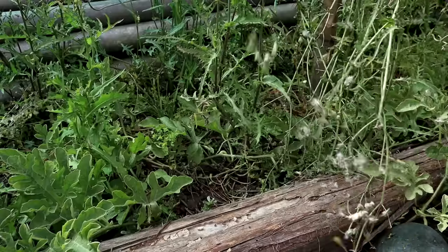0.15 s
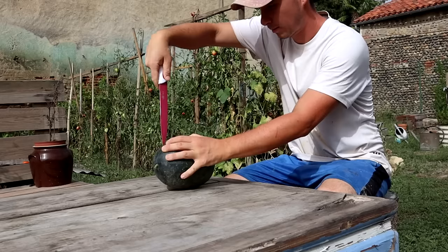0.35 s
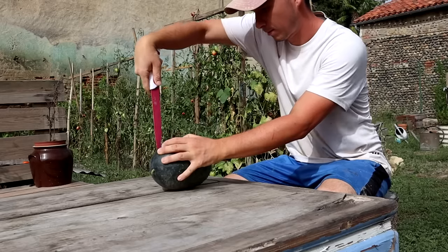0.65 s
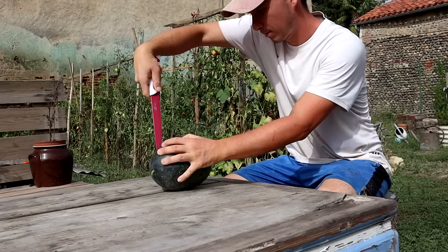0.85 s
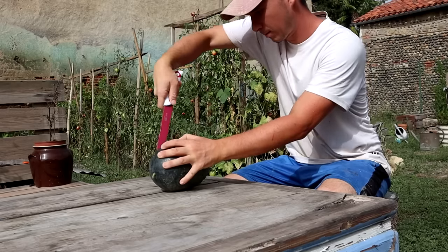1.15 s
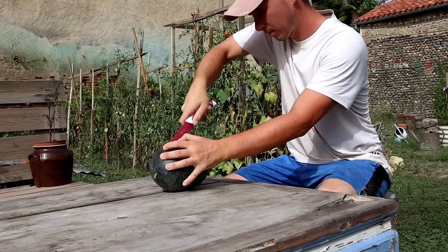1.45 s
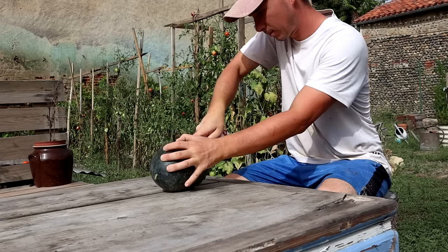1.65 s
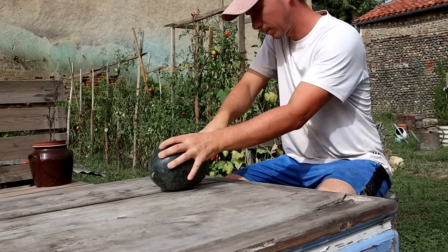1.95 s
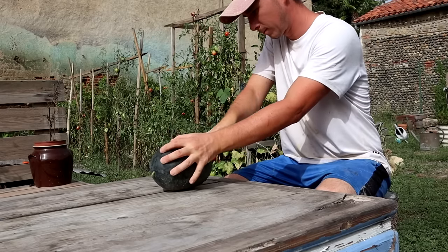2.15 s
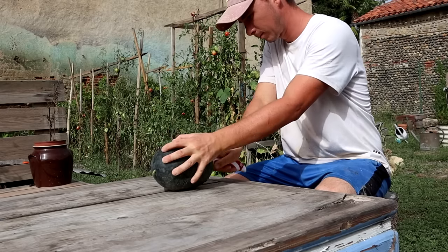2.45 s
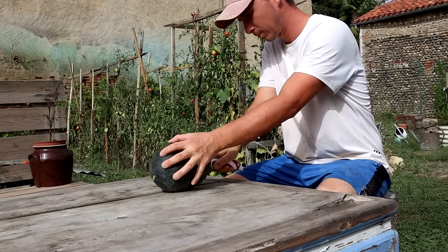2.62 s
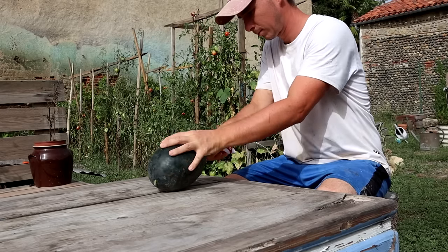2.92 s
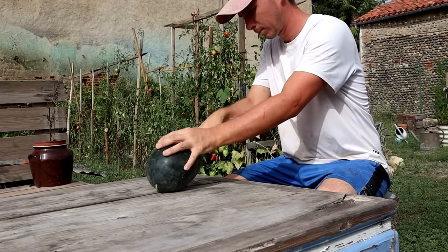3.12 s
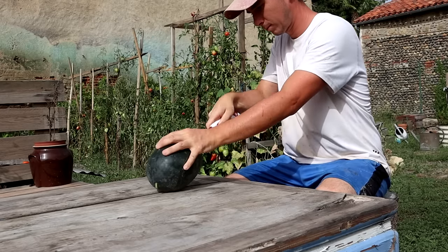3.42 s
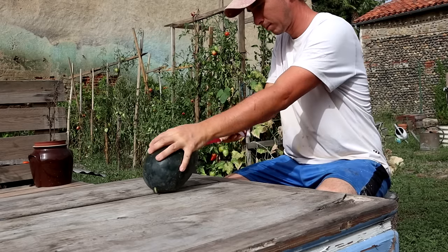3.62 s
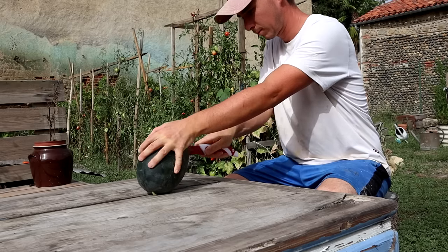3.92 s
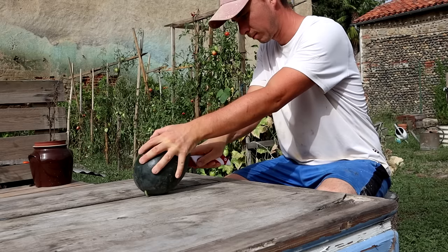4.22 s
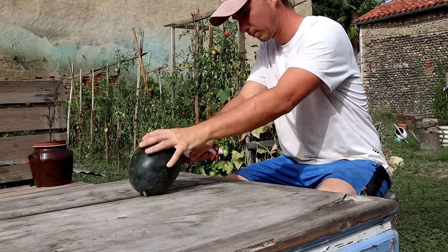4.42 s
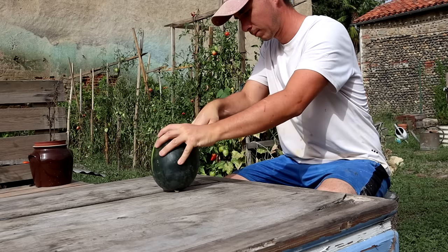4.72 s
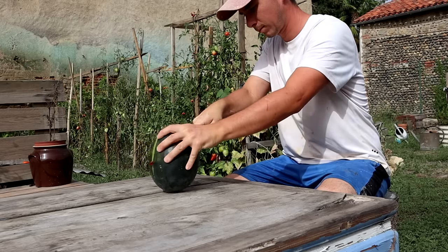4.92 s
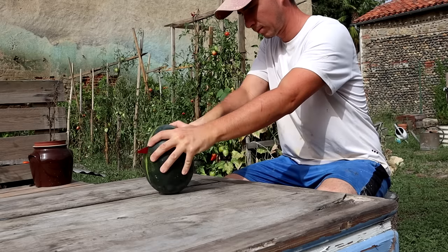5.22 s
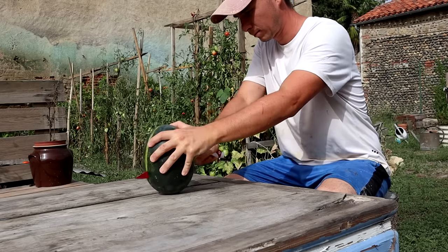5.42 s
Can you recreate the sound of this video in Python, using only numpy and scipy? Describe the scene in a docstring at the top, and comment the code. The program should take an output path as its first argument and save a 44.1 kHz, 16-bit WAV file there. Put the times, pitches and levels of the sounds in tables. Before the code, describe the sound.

A brief rustle of foliage with dry ticks gives way to near silence. A blade pushes into a melon close to the microphone: a crackling crunch, then a sharp snapping cluster, scattered scrapes and small cracks. Late on, the rind squeaks against the blade, rising and falling, before bright rasping cracks end it. A very faint bird whistles far off in the quiet yard.

```python
"""Knife through a watermelon

After rustling leaves, a long knife is worked round a watermelon on a wooden garden table.
Grain noise through resonances makes the rasp; splits of the rind snap, ring and thump modes of the melon.
Once the wet rind grips the steel and squeaks loudly: a gliding stick-slip tone with overtones.
The garden is quiet: shaped noise for air and leaves, swooping sines for a far bird.
"""
import sys
import numpy as np
from scipy import signal
from scipy.io import wavfile
from scipy.ndimage import uniform_filter1d

SR = 44100
rng = np.random.default_rng(int(sys.argv[2]) if len(sys.argv) > 2 else 0)


def file_out(sig):
    """Save sig as 16-bit WAV at sys.argv[1]."""
    # one column per channel
    cols = np.atleast_2d(sig).T
    # limit, then scale
    lim = np.clip(cols, -1, 1)
    pcm = np.round(lim * 32767).astype(np.int16)
    wavfile.write(sys.argv[1], SR, pcm)


N = 245637
TIME_S = np.arange(N) / SR
CUTOFF_HZ = 16000

# Air of the garden. Each row: frequency in Hz, density in relative dB per Hz.
AIR_SPECTRUM = [(15, -39), (25, -7), (206, -0.5), (427, -11), (714, -13), (796, -17), (1100, -18),
                (1400, -23), (1650, -18), (1940, -13), (2550, -27), (3920, -18), (5140, -31), (16000, -28)]
AIR_DB = -51
# Rustling leaves. Each row: frequency in Hz, density in relative dB per Hz.
LEAF_SPECTRUM = [(35, -46), (60, -16), (118, -18), (168, 3), (579, 1), (636, 6), (1340, 0.5), (3270, -3.5),
                 (6580, -17), (9350, -20), (13900, -16), (16000, -22)]
# Course of the rustle. Each row: time in seconds, relative level in dB.
RUSTLE_LEVELS = [(0.0, -28.5), (.116, -32.5), (.135, -49), (.15, -35.5), (.21, -35), (.245, -34.5),
                 (.35, -34)]
RUSTLE_END_S = 0.359
# Stems snapping among the leaves. Each row: start in seconds, peak in dB, pitch in Hz.
STEM_SNAPS = [(0.025, -17, 4230), (0.0555, -13.5, 3120), (0.1052, -18, 2350), (.121, -16, 5540),
              (.1315, -14.5, 6060), (0.134, -19, 6650), (0.137, -24, 7100), (0.2365, -12.5, 3250),
              (.254, -24, 5530)]
# Far bird. Each row: start in seconds, length in seconds, pitch in Hz, swoop in Hz, arches of the swoop,
# relative level in dB.
BIRD_NOTES = [(1.914, 0.071, 1800, 198, 2.1, -53), (1.972, .052, 1900, 600, 0.3, -51),
              (2.052, 0.034, 1780, 220, 0.56, -49), (2.085, 0.054, 1990, 700, 1.46, -44),
              (2.144, 0.074, 1980, 479, 2.1, -47.5), (2.247, .045, 1750, 130, 0.54, -53),
              (3.379, 0.054, 1857, 140, 0.49, -50), (3.42, 0.057, 2000, 450, 2.2, -50.5),
              (3.478, 0.078, 2010, -220, 2.65, -50), (3.662, .07, 2070, 282, 1.4, -54)]

# Free length of the blade singing. Each row: time in seconds, frequency in Hz, level in dB.
BLADE_SINGING = [(.93, 5500, -80), (1.0, 5420, -58), (1.17, 5310, -51), (1.38, 5240, -63), (1.5, 5300, -60),
                 (1.62, 5200, -72)]
# Pushes and pulls of the blade. Each row: full force at in seconds, attack in seconds, hold in seconds,
# then rasp of the rind, drag on the melon, coarse hiss and fine hiss in dB.
BLADE_STROKES = [(0.468, 0.065, 0.16, -57.5, -55.5, -63, -63), (0.742, 0.066, 0.11, -50.5, -58.5, -56, -54),
                 (0.976, .08, 0.38, -48, -52, -54, -59), (1.305, 0.52, 0.14, -64, -48.5, -64, -70),
                 (1.442, .12, 0.065, -36.5, -36, -45.5, -50), (1.557, 0.17, 0.028, -29.5, -32, -42, -43.5),
                 (1.672, 0.052, 0.078, -30.5, -26.5, -41, -39.5), (2.003, 0.073, .015, -56, -64, -56, -60),
                 (2.168, 0.092, 0.11, -56, -59.5, -63, -67), (2.335, 0.055, 0.071, -36, -41, -47, -48),
                 (2.492, 0.095, 0.056, -36, -46, -52.5, -48.5), (2.546, 0.029, 0.026, -27, -31, -36, -42),
                 (2.606, .02, 0.009, -46, -42, -57, -62), (2.732, 0.044, 0.062, -38.5, -53, -42, -49),
                 (2.942, 0.082, 0.077, -53, -60, -52.5, -50), (3.14, 0.019, .02, -43.5, -56, -50.5, -56),
                 (3.248, 0.042, 0.075, -44, -55.5, -53.5, -59.5),
                 (3.86, 0.27, 0.088, -46.5, -49.5, -52, -58), (3.939, 0.039, 0.012, -34.5, -37.5, -40, -44),
                 (4.031, .04, 0.063, -35.5, -36.5, -45, -49), (4.13, .05, .02, -43, -47.5, -54, -60),
                 (4.26, .08, 0.048, -39.5, -54.5, -46, -54), (4.207, 0.065, .01, -35, -45, -43, -53),
                 (4.349, 0.041, .012, -35.5, -42, -42.5, -49.5), (4.46, 0.13, 0.077, -53, -65, -58, -52),
                 (4.594, 0.077, .005, -38, -53, -41, -51), (4.789, 0.045, 0.018, -46, -34.5, -63, -69),
                 (4.953, 0.068, 0.011, -36.5, -43, -42.5, -41.5),
                 (5.008, 0.041, 0.0031, -38.5, -39, -49, -59), (5.073, 0.033, 0.096, -51, -55, -59, -63),
                 (5.333, 0.033, 0.053, -23.5, -36, -31.5, -34), (5.437, 0.041, 0.009, -33.5, -43, -38, -42),
                 (5.518, 0.082, 0.026, -38, -50, -48, -53)]
STROKE_RAMP_DB = 20  # swing over one attack or one release
# A stroke of FIRM_DB dies in RELEASE_S; each RELEASE_HALVES_DB more force halves that.
RELEASE_S, FIRM_DB, RELEASE_HALVES_DB = .07, -40, 26
# Melon under the dragging blade. Each row: frequency in Hz, width in Hz, gain in dB.
DRAG_PEAKS = [(128, 27, 4), (246, 54, -4), (330, 18, 6), (450, 81, 4), (625, 173, 6), (1044, 730, -5)]
# Blade held in the rind. Each row: frequency in Hz, width in Hz, gain in dB.
BLADE_PEAKS = [(1580, 460, -1.5), (1976, 300, 5), (2520, 730, 2.5), (3190, 410, 2.5), (3760, 640, -1.5),
               (5290, 1080, -4.5), (6200, 500, -10)]

# Stick-slip of the rind on the steel. Each row: time in seconds, slips per second before jitter.
SLIP_RATES = [(4.592, 790), (4.605, 950), (4.611, 680), (4.63, 830), (4.642, 730), (4.675, 1250),
              (4.681, 1520), (4.697, 1700), (4.712, 1570), (4.717, 1320), (4.755, 1030), (4.76, 540),
              (4.802, 290)]
# Grip of the rind. Each row: time in seconds, tone in dB, overtones in dB.
GRIP_LEVELS = [(4.588, -16, -33), (4.596, -7, -21), (4.636, -9.5, -15), (4.664, -11, -19),
               (4.684, -13, -34.5), (4.708, -19, -34.5), (4.718, -15.5, -29.5), (4.724, -22, -23),
               (4.736, -6.5, -23.5), (4.75, -18.5, -27), (4.758, -21, -35), (4.782, -19, -36),
               (4.8, -33.5, -57)]
# Raggedness of the slips. Each row: slips per second, roughness from 0 to 1.
SLIP_ROUGHNESS = [(700, 0.53), (950, 0.37), (1250, 0.03)]
# Rind driven by the slips. Each row: frequency in Hz, width in Hz, gain in dB.
RIND_PEAKS = [(309, 28, 3), (483, 36, 4.5), (544, 110, -4), (722, 66, -0.5), (846, 55, -7), (940, 45, -14),
              (1130, 70, -0.5), (1243, 93, -2), (1290, 71, -3), (1602, 61, 3.5)]
# Blade clamped by the rind. Each row: frequency in Hz, width in Hz, gain in dB.
CLAMPED_BLADE_PEAKS = [(1320, 300, 3), (2080, 165, 4.5), (2760, 210, -1), (3700, 460, -5),
                       (4160, 240, -1.5), (5080, 260, -4), (7260, 570, -16)]
SQUEAK_START_S, SQUEAK_END_S = 4.585, 4.803
SQUEAK_ATTACK_S, SQUEAK_RELEASE_S = 0.0068, 0.01
SPRAY_DB = -11.5  # juice spray against the overtones

# Clear splits of the rind, levels as rms over CRACK_S. Each row: start in seconds, ring pitch in Hz,
# ring in dB, snap in dB, thump in dB.
RIND_CRACKS = [(1.523, 1705, -24, -30, -24.5), (1.5402, 1020, -30, -28, -24.5),
               (1.561, 1590, -20.5, -23, -21.5), (1.583, 605, -25, -32, -36), (1.65, 644, -25, -28.5, -35),
               (1.6613, 660, -16, -25, -38), (1.672, 694, -9.5, -23, -27), (1.6888, 790, -11.5, -26, -40),
               (1.7075, 1470, -15, -21, -17.5), (1.729, 760, -18, -24, -31),
               (1.7505, 1920, -21.5, -27, -21), (1.7731, 1380, -28.5, -26.5, -46),
               (2.2907, 1700, -32, -30, -39.5), (2.334, 1740, -30, -28.5, -45),
               (2.339, 2190, -30, -22, -23), (2.342, 1810, -22, -20, -33),
               (2.3645, 3500, -15.5, -18.5, -12.5), (2.374, 620, -39.5, -35, -29.5),
               (2.4, 570, -42, -31, -54), (2.5235, 2250, -30.5, -30, -43), (2.5436, 2170, -20, -16.5, -20),
               (2.5455, 726, -15.5, -34, -21.5), (2.5543, 2260, -18.5, -28, -43),
               (2.569, 730, -23, -23, -35), (2.586, 1105, -13.5, -41, -13), (3.772, 2300, -45, -40, -54),
               (3.7895, 2210, -48, -42, -55), (3.803, 2280, -48, -38, -44), (3.832, 2300, -40, -33, -45),
               (3.915, 1810, -45, -37, -42), (3.927, 800, -28, -31.5, -40), (3.941, 764, -25, -22, -30.5),
               (3.951, 1280, -27, -28.5, -42), (3.957, 2380, -26.5, -26.5, -25.5),
               (4.0145, 2170, -28.5, -26.5, -31), (4.0336, 2140, -25.5, -25.5, -29),
               (4.052, 2040, -20, -24, -21), (4.061, 1210, -38, -33, -23),
               (4.0775, 1740, -22.5, -27.5, -35), (4.774, 960, -25, -35, -26), (4.78, 710, -37, -34.5, -16),
               (5.2422, 1930, -30.5, -28, -42.5), (5.2875, 1700, -39.5, -34, -43),
               (5.3053, 2010, -30, -25.5, -40), (5.323, 2170, -31, -29, -39),
               (5.3515, 1630, -22.5, -40, -44), (5.3839, 1646, -13, -21, -24.5),
               (5.3895, 1660, -14, -15.5, -35), (5.3971, 1630, -21, -17, -21.5),
               (5.4261, 1700, -14, -17.5, -29), (5.434, 1820, -21, -16.5, -27.5),
               (5.458, 1640, -27.5, -25, -39), (5.5367, 1700, -35.5, -30.5, -40.5)]
CRACK_S = .005
# Seat of the melon and wetness of the cut. Each row: time in seconds, lift of the low modes in dB per
# octave, fizz over snap in dB.
SEAT_AND_WETNESS = [(1.55, 5.5, -10.5), (1.68, -3.5, -6.5), (1.77, 8, -7), (2.36, 2.5, -7),
                    (2.53, 9.5, -6.5), (2.6, 6, -7), (3.95, -4, -3.5), (4.08, -5, -2.5), (5.3, -1, -12)]
# Modes of the melon on its table. Each row: frequency in Hz, relative level in dB, t60 in seconds.
MELON_MODES = [(137.3, -7.5, 0.24), (178.5, -14.5, 0.22), (216.6, -4, 0.21), (277.6, -3, 0.12),
               (341.8, 2, 0.14), (380, -1, 0.19), (436, -6, 0.22), (493.3, 4, 0.13), (563.6, 3.5, 0.085),
               (613, 6, 0.017), (708, 5, 0.082), (803, -5, 0.049), (950, -14.5, 0.1), (1070, -13, 0.048),
               (1171, -11.5, 0.051), (1400, -35, 0.12), (1457, -12, 0.097)]
# Wet cells spitting from a split. Each row: frequency in Hz, width in Hz, gain in dB.
JUICE_PEAKS = [(7360, 2300, 4.5), (11300, 2300, 1.5), (13300, 2100, 4), (15200, 2500, 0)]
# Random chips: candidates per second, least rasp, level against the stroke and its spread either way.
CHIPS_PER_S, CHIP_ABOVE_DB, CHIP_DB, CHIP_SPREAD_DB = 48, -36, -5, 3.5
CHIP_LOW_HZ, CHIP_HIGH_HZ = 600, 2220


def from_db(db):
    """Decibels to gain."""
    return 10 ** (np.asarray(db) / 20)


def rms_one(x):
    """Scale to rms 1."""
    return x / np.sqrt(np.mean(x ** 2) + 1e-20)


def crack_one(x):
    """Scale to the energy of rms 1 held for CRACK_S."""
    return x / np.sqrt(np.sum(x ** 2) / (CRACK_S * SR) + 1e-20)


def evened(x):
    """Hold the rms near 1 over windows of about 6 ms."""
    return x / np.sqrt(np.abs(uniform_filter1d(x * x, size=260)) + 1e-12)


def in_time(rows, t_s=TIME_S):
    """Interpolate each column of a time curve at t_s."""
    rows = np.array(rows, float)
    rows = rows[np.argsort(rows[:, 0])]
    return [np.interp(t_s, rows[:, 0], column) for column in rows.T[1:]]


def add(out, start_s, sound):
    """Mix a sound in at start_s."""
    i = max(round(start_s * SR), 0)
    out[i:i + len(sound)] += sound[:N - i]


def band(x, low_hz, high_hz, order=2):
    """Butterworth band-pass, upper edge capped at 0.45 SR."""
    edges_hz = [low_hz, min(high_hz, .45 * SR)]
    sos = signal.butter(order, edges_hz, "band", fs=SR, output="sos")
    return signal.sosfilt(sos, x + 1e-18)


def resonate(x, peaks):
    """Parallel two-pole resonances of alternating sign."""
    out = 0
    for k, (hz, width_hz, db) in enumerate(peaks):
        r = np.exp(-np.pi * width_hz / SR)
        poles = [1, -2 * r * np.cos(2 * np.pi * hz / SR), r * r]
        gain = (-1) ** k * from_db(db) * (1 - r * r) / 2
        out = out + gain * signal.lfilter([1, 0, -1], poles, x + 1e-18)
    return out


def drift(rate_hz, size=N):
    """Random values of rms 1, joined by straight lines, rate_hz new ones a second."""
    at = np.arange(size) * rate_hz / SR
    return rms_one(np.interp(at, np.arange(8192), rng.standard_normal(8192)))


def grains(spread_db, size=N):
    """A dense stream of tiny ruptures of very unequal size; rms 1."""
    size_db = spread_db * np.minimum(rng.exponential(1, size), 6)
    return rms_one(rng.standard_normal(size) * from_db(size_db))


def burst(t_s, tear_s, after_db, after_s, first):
    """One fibre breaks, its neighbours tear at once, and a few more follow."""
    decay = np.exp(-t_s / tear_s) + from_db(after_db) * np.exp(-t_s / after_s)
    tear = grains(4.1, size=len(t_s)) * decay
    tear = tear / np.sqrt(np.sum(tear ** 2))
    tear[0] = first
    return tear


def colour(x, spectrum):
    """Weight half-octave bands of x by a spectrum; rms 1."""
    hz, db = np.transpose(spectrum)
    edges_hz = 22 * 2 ** np.arange(0, 10, .5)
    out = 0
    for low_hz, high_hz in zip(edges_hz, edges_hz[1:]):
        if high_hz > hz[0]:
            centre_db = np.interp(np.log(low_hz * high_hz) / 2, np.log(hz), db)
            out = out + from_db(centre_db) * band(x, low_hz, high_hz, order=1)
    return rms_one(band(out, hz[0], 2 * CUTOFF_HZ))


def yard(x, wet_db, t60_s, dull_hz):
    """Table top, fence and walls scatter back a short, dull tail."""
    t_s = np.arange(SR // 3) / SR
    noise = band(rng.standard_normal(len(t_s)), 110, dull_hz, order=1)
    tail = noise * from_db(-60 * t_s / t60_s) * (t_s > .002)
    tail = tail / np.sqrt(np.sum(tail ** 2))
    return x + from_db(wet_db) * signal.fftconvolve(x, tail)[:N]


def air():
    """Quiet garden air: steady noise, strongest in the bass."""
    return from_db(AIR_DB) * colour(rng.standard_normal(N), AIR_SPECTRUM)


def leaves():
    """Leaves brush together as fluttering grains; a few dry stems tick as short resonant bursts."""
    level_db, = in_time(RUSTLE_LEVELS)
    brushing = colour(grains(2.5) * from_db(2.1 * drift(153.1)), LEAF_SPECTRUM)
    fade = np.clip((RUSTLE_END_S - TIME_S) / 0.0021, 0, 1)
    out = from_db(level_db - 4.0) * brushing * fade
    t_s = np.arange(SR // 40) / SR
    for start_s, peak_db, hz in STEM_SNAPS:
        tear = burst(t_s, tear_s=0.0005, after_db=-6, after_s=0.0036, first=0.94)
        tick = resonate(tear, [(hz, 1500, 0)])
        add(out, start_s, from_db(peak_db) * tick / np.max(np.abs(tick)))
    return out


def bird(top_db):
    """A thin whistle that slurs or trills in quick arches, loudest at the top of each."""
    out = np.zeros(N)
    for start_s, length_s, hz, swoop_hz, arches, db in BIRD_NOTES:
        along = np.linspace(0, 1, round(length_s * SR))
        arch = np.abs(np.sin(np.pi * arches * along))
        whistle = np.sin(2 * np.pi * np.cumsum(hz + swoop_hz * arch) / SR)
        gain = from_db(db + np.clip(top_db, 1, 8) * (arch - 2.5))
        add(out, start_s, gain * signal.windows.tukey(len(along), .5) * whistle)
    return yard(out, wet_db=-11, t60_s=.2, dull_hz=4000)


def singing(width_hz):
    """Friction keeps one mode of the steel ringing; it mostly sinks as the flesh loads the blade."""
    hz, db = in_time(BLADE_SINGING)
    r = np.exp(-np.pi * width_hz / SR)
    noise = rng.standard_normal(N) + 1j * rng.standard_normal(N)
    rubbing = signal.lfilter([1], [1, -2 * r, r * r], noise)
    carrier = np.exp(2j * np.pi * np.cumsum(hz) / SR)
    return from_db(db) * rms_one(np.real(rubbing * carrier))


def blade_work():
    """Strokes swell, hold and die, hard ones soonest; rows: s, then rasp, drag, coarse, fine hiss in dB."""
    t_s = np.arange(0, N / SR, .002)
    power = 1e-12
    for full_s, attack_s, hold_s, *levels_db in BLADE_STROKES:
        release_s = RELEASE_S * 2 ** ((FIRM_DB - max(levels_db)) / RELEASE_HALVES_DB)
        away = np.maximum((full_s - t_s) / attack_s, (t_s - full_s - hold_s) / release_s)
        fall_db = STROKE_RAMP_DB * np.clip(away, 0, 10)[:, None]
        power = power + from_db(np.array(levels_db) - fall_db) ** 2
    return np.column_stack([t_s, 10 * np.log10(power)])


def slicing(judder_db, deepen):
    """Cells burst along the edge; the harder the blade is pushed, the more it judders."""
    rasp_db, drag_db, coarse_db, fine_db = in_time(blade_work())
    push = np.clip((rasp_db + 49) / 20, .1, 1)
    cells = grains(2.9) * from_db(judder_db * push * (drift(350) - 1.0))
    drag = rms_one(band(resonate(cells, DRAG_PEAKS), 148, 1650))
    # a blade that drags hard rasps low; one that slides freely rasps high
    steel = resonate(cells, BLADE_PEAKS)
    depth = from_db(deepen * np.clip(drag_db - rasp_db + 1.5, -14, 3))
    low_rasp = rms_one(band(steel, 940, 2240))
    high_rasp = rms_one(band(steel, 3110, 5330))
    rasp = (depth * low_rasp + high_rasp) / np.hypot(1, depth)
    coarse = rms_one(band(cells, 5300, 8200))
    fine = rms_one(band(cells, 12000, 14500))
    hiss = from_db(coarse_db) * coarse + from_db(fine_db) * fine
    return from_db(drag_db) * drag + from_db(rasp_db) * rasp + hiss


def squeak(jitter, shimmer_db, chatter_db, rind_db, grit_db, flutter_db, smooth_db):
    """The rind sticks and slips on the steel: ragged when slow, nearly a pure tone when fast."""
    t_s = np.arange(round(SQUEAK_START_S * SR), round(SQUEAK_END_S * SR)) / SR
    size = len(t_s)
    slips_hz, = in_time(SLIP_RATES, t_s)
    tone_db, overtone_db = in_time(GRIP_LEVELS, t_s)
    rough = np.interp(slips_hz, *np.transpose(SLIP_ROUGHNESS))
    rise, fall = (t_s - t_s[0]) / SQUEAK_ATTACK_S, (t_s[-1] - t_s) / SQUEAK_RELEASE_S
    gate = np.clip(np.minimum(rise, fall), 0, 1)
    wobble = jitter * (rough + .1) * drift(700, size=size)
    phase = 2 * np.pi * np.cumsum(slips_hz * (1 + wobble)) / SR
    k = np.arange(2, 9)[:, None]
    flutter = np.array([drift(252.8, size=size) for _ in k])
    partials = np.sin(k * phase) / k * from_db(flutter_db * flutter)
    # the fastest slips lose their corners
    partials = partials * from_db(-smooth_db * (k - 2) * np.clip((slips_hz - 1350) / 150, 0, 1))
    # every slip scuffs the blade
    scuff = grains(1.6, size=size) * (1.7 + np.cos(phase)) ** 2
    chatter = from_db(chatter_db) * rms_one(band(scuff, 466, 1500, order=3))
    drive = np.sin(phase) + (rough + 0.078) * (0.52 * partials[0] + chatter)
    # the rind rings on behind the gliding pitch and beats against it
    rind = from_db(rind_db) * resonate(drive, RIND_PEAKS)
    tone = evened(band(drive + rind, 184, 2580, order=3))
    # overtones sweep through the blade's resonances
    edge = rms_one(partials.sum(axis=0)) + from_db(grit_db) * (rough + 0.38) * rms_one(scuff)
    overtones = evened(band(resonate(edge, CLAMPED_BLADE_PEAKS), 1680, 5200, order=4))
    spray = evened(band(scuff, 4850, 7640))
    voice = from_db(tone_db) * tone + from_db(overtone_db) * (overtones + from_db(SPRAY_DB) * spray)
    out = np.zeros(N)
    add(out, SQUEAK_START_S, gate * voice * from_db(shimmer_db * drift(300, size=size)))
    # the whole melon rings along; a t60 sets each width
    modes = [(hz, np.log(1000) / (np.pi * t60_s), db) for hz, db, t60_s in MELON_MODES]
    return out + from_db(-9) * resonate(out, modes)


def chips():
    """Small splits that come at random while the blade is pushed hard; rows like RIND_CRACKS."""
    chance = rng.random((round(CHIPS_PER_S * N / SR), 3))
    start_s = chance[:, 0] * N / SR
    pitch_hz = CHIP_LOW_HZ * (CHIP_HIGH_HZ / CHIP_LOW_HZ) ** chance[:, 1]
    size_db = CHIP_DB + CHIP_SPREAD_DB * (2 * chance[:, 2] - 1)
    rasp_db, drag_db, _, _ = in_time(blade_work(), start_s)
    ring_db = (rasp_db + drag_db) / 2 + size_db
    rows = np.column_stack([start_s, pitch_hz, ring_db, rasp_db + size_db, drag_db + size_db])
    return rows[rasp_db > CHIP_ABOVE_DB].tolist()


def wet(x):
    """The high spit of bursting cells; rms 1."""
    return rms_one(band(resonate(x, JUICE_PEAKS), 4600, 15500))


def rind_ring(t_s, pitch_hz):
    """The split rind rings two partials, 60 dB down after 14 cycles, over a tearing noise."""
    cycles = pitch_hz * t_s
    partials = np.sin(2 * np.pi * cycles) + 0.13 * np.sin(2 * np.pi * 1.37 * cycles)
    tear = burst(t_s, tear_s=0.0022, after_db=-17, after_s=0.0023, first=0.28)
    return crack_one(partials * from_db(-60 * cycles / 14)) + 0.58 * crack_one(band(tear, 570, 1800))


def melon_thump(t_s, lift_db):
    """Modes of melon and table die away, each with a random strength, sign and slight detuning."""
    hz, mode_db, t60_s = np.array(MELON_MODES).T[:, :, None]
    # positive lift favours the low modes
    share_db = rng.normal(0, 0.96, hz.shape) - lift_db * np.log2(hz / hz[0])
    share = from_db(share_db) * rng.choice([-1, 1], hz.shape)
    detune = rng.normal(1, 0.02, hz.shape)
    dying = from_db(mode_db - 60 * t_s / t60_s)
    modes = dying * share * np.sin(2 * np.pi * hz * t_s * detune)
    return band(np.sum(modes, axis=0), 107, 1770, order=3)


def cracks():
    """Each split snaps, fizzes, rings the rind for a few cycles and thumps the melon against the table."""
    out, t_s = np.zeros(N), np.arange(SR // 5) / SR
    brief_s = t_s[:SR // 20]
    for start_s, pitch_hz, ring_db, snap_db, thump_db in list(RIND_CRACKS) + chips():
        lift_db, fizz_db = in_time(SEAT_AND_WETNESS, start_s)
        snap_tear = burst(brief_s, tear_s=0.0005, after_db=-20, after_s=0.005, first=0.56)
        snap = band(snap_tear, 2160, 5220, order=3)
        fizz = wet(burst(brief_s, tear_s=0.0013, after_db=-16, after_s=0.012, first=0.58))
        ring = rind_ring(brief_s, pitch_hz)
        thump = melon_thump(t_s, lift_db)
        add(out, start_s, from_db(ring_db) * crack_one(ring) + from_db(snap_db) * crack_one(snap))
        add(out, start_s, from_db(thump_db) * crack_one(thump))
        # the fizz starts 0.4 ms before the snap, ring and thump
        add(out, start_s - .0004, from_db(snap_db + fizz_db) * crack_one(fizz))
    return out


def scene():
    """The melon close by, the garden around it."""
    garden = air() + leaves() + bird(top_db=1)
    melon = slicing(judder_db=3.0, deepen=0.4) + singing(width_hz=630)
    melon = melon + squeak(jitter=0.048, shimmer_db=2.0, chatter_db=-3, rind_db=-0.5, grit_db=7.5,
                           flutter_db=3.0, smooth_db=9)
    # so small a body radiates no deep bass
    melon = band(melon + cracks(), 107, 2 * CUTOFF_HZ, order=3)
    return (yard(melon, wet_db=-16.5, t60_s=0.095, dull_hz=2060) + garden)[None]


def record(dry):
    """The loudest peaks are rounded off and the top is cut."""
    held = dry / (1 + dry ** 8) ** (1 / 8)
    return signal.sosfilt(signal.ellip(10, .1, 70, CUTOFF_HZ, fs=SR, output="sos"), held)


dry = scene()
out = record(dry)
file_out(out)
```